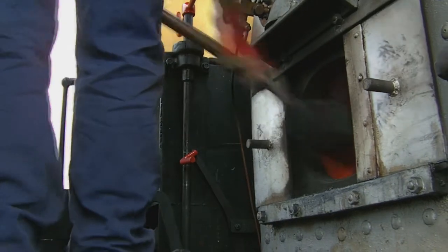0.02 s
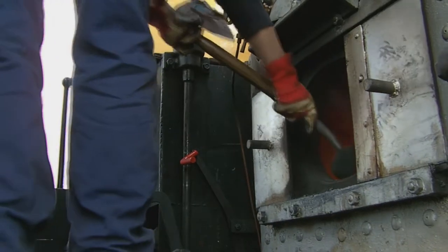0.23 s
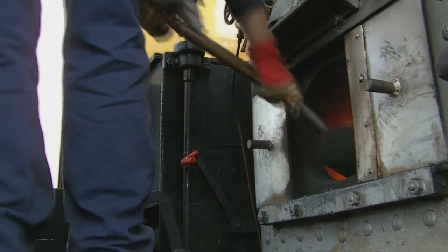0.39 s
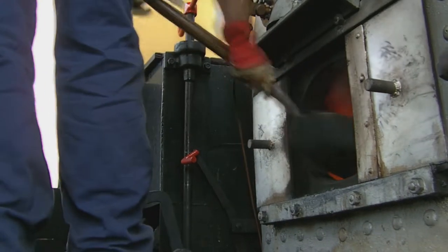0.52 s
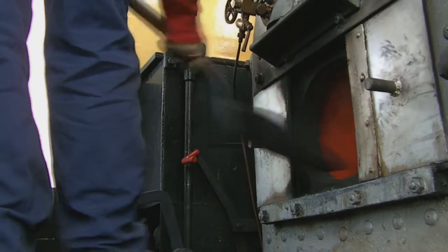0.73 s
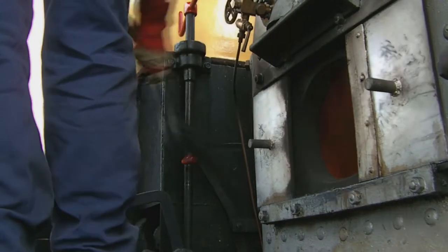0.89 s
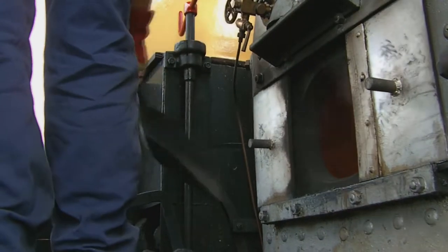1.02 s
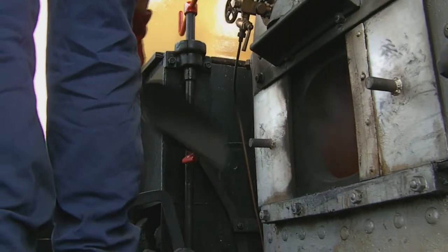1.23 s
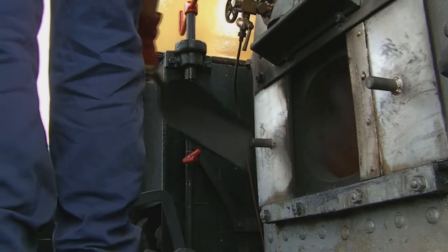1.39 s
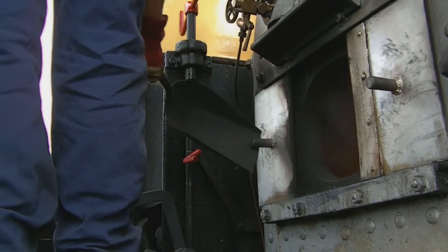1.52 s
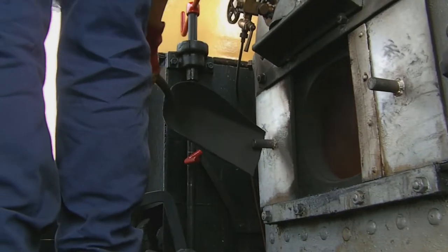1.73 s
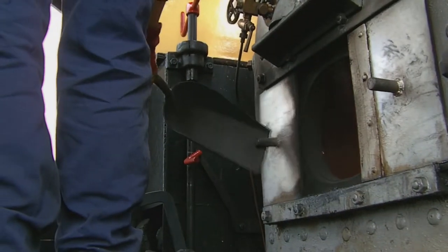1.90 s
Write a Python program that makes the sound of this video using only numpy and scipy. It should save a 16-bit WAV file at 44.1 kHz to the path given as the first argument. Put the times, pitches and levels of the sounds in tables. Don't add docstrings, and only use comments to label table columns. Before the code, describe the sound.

A steel coal shovel scrapes and clangs against iron, its blade ringing with a singing metallic tone.

```python
import sys
import numpy as np
from scipy import signal
from scipy.fft import rfft, irfft, next_fast_len
from scipy.io import wavfile
from scipy.ndimage import uniform_filter1d

SR = 44100
rng = np.random.default_rng(int(sys.argv[2]) if len(sys.argv) > 2 else 0)


def pcm_store(signal):
    levels = np.round(np.clip(np.atleast_2d(signal), -1, 1) * 32767)
    wavfile.write(sys.argv[1], SR, levels.astype(np.int16).T)


def nominal_scale(level):
    x = np.asarray(level, float) / 20
    return 10 ** x


N = 85995
SING_HZ = 705

PAN_HZ = [408, 503, 645, 972, 1205, 1270, 1346, 1484, 1621, 1800, 1964, 2057, 2121, 2396]
RIM_HZ = [2557, 2642, 2660, 2683, 2724, 3052, 3325, 3465, 4011, 4158, 4980]
PAN_T60_S = [0.56, 0.47, 0.34, 0.4, 0.33, 0.21, 0.32, 0.17, 0.34, 0.26, 0.34, 0.66, 0.41, 0.14]
RIM_T60_S = [.26, .85, .65, .6, .6, .35, .3, 1.2, .26, .22, .16]


def rms_one(x):
    return x / np.sqrt(np.mean(x ** 2) + 1e-20)


def at_hz(points, hz):
    table_hz, value = np.transpose(points)
    return np.interp(np.log(hz), np.log(table_hz), value)


def drift(rate_hz):
    pole = np.exp(-80 * np.pi * rate_hz / SR)
    white = rng.standard_normal(N // 40 + 2002)
    slow = signal.lfilter([1], [1, -2 * pole, pole * pole], white)[2000:]
    return np.interp(np.arange(N) / 40, np.arange(len(slow)), rms_one(slow))


def ring(hz, gain, t60_s, size):
    t = np.arange(size) / SR
    decay = np.exp(-np.log(1000) * np.outer(1 / t60_s, t))
    return gain @ (np.sin(2 * np.pi * np.outer(hz, t)) * decay)


def add(out, start_s, x):
    i = int(start_s * SR)
    out[i:i + len(x)] += x[:N - i]


def high_pass(x, order, cut_hz):
    return signal.sosfilt(signal.butter(order, cut_hz, "high", fs=SR, output="sos"), x)


def body(tilt_db_oct, share, count, size):
    # freq_hz, level_db
    spectrum = [(250, -14.5), (500, -7.5), (1000, -5.5), (2300, -2), (4000, -13.5), (7500, -13.5),
                (11000, -22.5), (15500, -36.5)]
    # freq_hz, t60_s
    decay_table = [(300, 0.52), (1000, 0.39), (3000, 0.35), (7000, 0.19), (14000, 0.01)]
    blur_share, rise_s = 0.71, .0007
    share, t = np.clip(share, .03, 3), np.arange(size) / SR

    def colour(hz):
        return nominal_scale(at_hz(spectrum, hz) + tilt_db_oct * np.log2(hz / 3000))

    spots, luck = rng.random(count), rng.standard_normal((2, count))
    hz = 400 + 14000 * ((np.arange(count) + spots) / count) ** 1.4
    gain = luck[0] * colour(hz)
    t60_s = at_hz(decay_table, hz) * share * np.exp(.12 * luck[1])
    apart = ring(hz, gain, t60_s, size) / np.sqrt(np.sum((hz > 1500) * gain ** 2))

    f = np.arange(size // 2 + 1) * SR / size + 1
    white = rfft(rng.standard_normal(size)) * colour(f)
    centres_hz = np.geomspace(250, 16000, 13)[:, None]
    bands = irfft(white * np.maximum(0, 1 - 2 * np.abs(np.log2(f / centres_hz))), size)
    decay = np.exp(-np.log(1000) * t / (at_hz(decay_table, centres_hz) * share))
    blur = np.sum(bands * decay, axis=0)
    blur = blur / np.std(irfft(white * (f > 1500), size)) / np.sqrt(2)

    mix = np.sqrt(1 - blur_share) * apart + np.sqrt(blur_share) * blur
    return mix * np.minimum(1, t / rise_s) / 2


def knocks():
    # start_s, peak_db, tilt_db_oct, ring_share, chatter_s
    hits = [
        (0.338, -8, -2.5, 0.73, 0.0079),
        (0.6650, -14, -2, 1, 0.0023),
        (0.7628, -7, 0.5, 0.96, 0.0043),
        (1.556, 0, 1, 0.74, 0.013),
    ]
    pan_struck_db = [
        [-53.5, -22.5, -22, -17, -35, -16.5, -23, -19, -22, -20.5, -20.5, -27.5, -28, -43.5],
        [-53.5, -23.5, -17, -52.5, -47.5, -40, -17, -18, -30.5, -31.5, -23, -29.5, -33, -50],
        [-28, -8, -21, -61, -20.5, -54, -16.5, -19.5, -25.5, -20, -34, -24, -24, -45],
        [-51, -12, -18, -28.5, -17, -72, -26, -31, -19, -40, -31, -47.5, -30, -14],
    ]
    rim_struck_db = [
        [-19, -29, -60, -24, -60, -40, -37, -41, -31, -42, -45],
        [-45, -45, -60, -30, -60, -45, -44, -41, -48, -50, -50],
        [-40, -41, -60, -29, -60, -22, -23, -45, -45, -25, -27],
        [-35, -60, -27, -60, -35, -35, -26, -60, -36, -40, -40],
    ]
    # knock_index, mode_hz, split_hz, twin_share (negative = opposed)
    twins = [(2, 2683, 7, .8), (2, 2057, -3.9, -.75), (2, 3052, 10, .6), (2, 3465, 2.7, .8),
             (3, 503, -11.5, -.5), (0, 2683, 6, .5)]
    crack_db = [-2.5, -12, -4, -12]
    pan_free = [0.88, 0.81, 0.94, 0.74]
    stop_s, crack_s, body_db = 0.0048, .0012, -4.5

    out, size = np.zeros(N), SR // 2
    hz, t60_s = np.array(PAN_HZ + RIM_HZ), np.array(PAN_T60_S + RIM_T60_S)
    is_pan = np.arange(len(hz)) < len(PAN_HZ)
    later, t = np.arange(2 * size) / SR, np.arange(1500) / SR
    for k, (start_s, peak_db, tilt_db_oct, share, chatter_s) in enumerate(hits):
        until_next_s = hits[k + 1][0] - start_s if k + 1 < len(hits) else 1
        gain = nominal_scale(np.array(pan_struck_db[k] + rim_struck_db[k])) * rng.choice([-1, 1], len(hz))
        decay_s = t60_s * np.where(is_pan, pan_free[k], 1)
        clear = ring(hz, gain, decay_s, 2 * size)
        for knock, mode_hz, split_hz, twin_share in twins:
            if knock == k:
                pick = hz == mode_hz
                clear += ring(hz[pick] + split_hz, twin_share * gain[pick], decay_s[pick], 2 * size)
        damping = np.exp(-np.maximum(0, later - until_next_s) / stop_s)
        add(out, start_s, clear * np.minimum(1, later / .004) * damping)

        bumps = (rng.random(1500) < .02) * rng.standard_normal(1500) * np.exp(-t / chatter_s)
        bumps[0] = 2
        bumps = bumps / np.sqrt(np.sum(bumps ** 2))
        dense = signal.fftconvolve(body(tilt_db_oct, share, count=90, size=size), bumps)
        add(out, start_s, nominal_scale(peak_db + body_db) * dense)
        add(out, start_s, nominal_scale(crack_db[k]) * np.sin(2 * np.pi * 1300 * t) * np.exp(-t / crack_s))
    return out


def singing():
    # time_s, level_db_rms
    swell = [(.05, -59), (0.132, -32.5), (.29, -23.5), (0.401, -22.5), (0.439, -21.5), (.53, -14),
             (.60, -8), (0.67, -8.5), (0.676, -17), (0.701, -14.5), (.784, -27), (.886, -24.5),
             (1.142, -35.5), (1.286, -52.5), (1.555, -48), (1.566, -17), (1.854, -27), (1.95, -34.5)]
    # from_s, to_s, depth_share
    rubbing = [
        (0, .41, .9),
        (.675, .80, .45),
        (1.25, 1.55, .9),
    ]
    sag_start_s, sag_hz_per_s = 1.6, 14
    rough, flutter_hz = .025, 12
    rub_depth, rub_hz = 0.74, 44

    time_s, level_db = np.transpose(swell)
    t = np.arange(N) / SR
    pitch_hz = SING_HZ - sag_hz_per_s * np.maximum(0, t - sag_start_s)
    phase = 2 * np.pi * np.cumsum(pitch_hz) / SR
    contact = sum(share * (t >= a) * (t < b) for a, b, share in rubbing)
    rub = rub_depth * uniform_filter1d(contact, size=600)
    swing = 1 + rough * drift(flutter_hz) + rub * (drift(rub_hz) + 1j * drift(rub_hz))
    tone = np.real(swing * np.exp(1j * phase)) / np.sqrt(1 + 2 * rub ** 2)
    return np.sqrt(2) * nominal_scale(np.interp(t, time_s, level_db)) * tone


def drag():
    # time_s, level_db, tilt_db_oct
    strokes = [
        [(.05, -36.5, -5), (.12, -42, -0.5), (.2, -36, -1.5), (.23, -27, 0.5), (.31, -32.5, 3.5),
         (.42, -34, -4), (.47, -48, 3.5), (.58, -51.5, 6)],
        [(.665, -38.5, -2.5), (.74, -22.5, 0), (.755, -36, 4)],
        [(1.87, -55, -0.5), (1.89, -57, 4.5), (1.95, -47.5, 4)],
    ]
    slips_per_s, slip_spread_db, rasp_db, rasp_hz = 900, 4, 2.0, 17
    ring_share, drag_db = .35, -2

    t, out = np.arange(N) / SR, np.zeros(N)
    slip_db = slip_spread_db * np.minimum(rng.exponential(1, N), 4) + rasp_db * drift(rasp_hz)
    slips = (rng.random(N) < slips_per_s / SR) * nominal_scale(slip_db) * rng.choice([-1, 1], N)

    hz = np.array(PAN_HZ + RIM_HZ[:-1] + [SING_HZ])
    clear_gain = nominal_scale(-12.0 - 3.36 * np.log2(hz / 1000))
    blade = body(0, ring_share, count=60, size=SR // 6)
    blade = blade + ring(hz, clear_gain, np.full(len(hz), .12), SR // 6)
    dull = signal.sosfilt(signal.butter(2, 3000, fs=SR, output="sos"), blade)
    scale = np.sqrt(np.mean(slips ** 2) * np.sum(dull ** 2))
    for stroke in strokes:
        time_s, level_db, tilt_db_oct = np.transpose(stroke)
        push = slips * nominal_scale(np.interp(t, time_s, level_db, left=-120, right=-120) + drag_db) / scale
        bright_push = push * nominal_scale(2 * np.interp(t, time_s, tilt_db_oct))
        out += signal.fftconvolve(push, dull)[:N]
        out += signal.fftconvolve(bright_push, blade - dull)[:N]
    return out


def touches():
    # start_s, peak_db, tilt_db_oct, ring_share
    ticks = [(0.0635, -29, 5.5, 1), (0.0886, -29.5, -10, 0.99), (0.166, -32.5, 15, 0.6),
             (0.21, -16.5, -9.5, 0.96), (0.2271, -13.5, -5.5, 1), (0.2537, -19, 6.5, 0.01),
             (0.3187, -4.5, 1.5, 0.56), (0.3894, -13.5, -9, 0.7), (0.7306, -15, -6, 0.98),
             (1.21, -36, 17, 0.35), (1.4277, -34, -4.5, 0.43), (1.6992, -35, 2.5, 0.67),
             (1.8089, -41, -15, 0.43), (1.824, -34, 6.5, 0.7), (1.884, -26.5, -4, 0.62),
             (1.5583, -21, 9, 1.8)]
    clear_db, scatter_db, longest_t60_s, touch_db = -24, 5, .1, -7.5

    out = np.zeros(N)
    hz, t60_s = np.array(PAN_HZ + RIM_HZ), np.array(PAN_T60_S + RIM_T60_S)
    for start_s, peak_db, tilt_db_oct, share in ticks:
        slope_db = (np.minimum(tilt_db_oct, 0) + 6.5) * np.log2(hz / 3000)
        gain = nominal_scale(clear_db + scatter_db * rng.standard_normal(len(hz)) + slope_db)
        decay_s = np.minimum(t60_s, longest_t60_s) * np.clip(share, .03, 1)
        clear = ring(hz, gain, decay_s, size=5000)
        dense = body(tilt_db_oct, share, count=30, size=5000)
        add(out, start_s, nominal_scale(peak_db + touch_db) * (dense + clear))
    return out


def catches():
    # start_s, peak_db, centre_hz, t60_s
    snags = [(.1662, -27.5, 720, .05), (.178, -28, 720, .06), (.2085, -31, 800, .06),
             (.2267, -26.5, 2200, .07), (.2275, -18, 1500, .06), (.2525, -30, 5600, .12),
             (.2525, -25.5, 760, .06), (.272, -29.5, 3800, .1), (.286, -25.5, 750, .08),
             (.391, -35, 4100, .15), (.6653, -23, 1450, .04), (.676, -18.5, 1400, .04),
             (.6982, -17, 1400, .04), (.727, -20.5, 2800, .08), (.7626, -17.5, 3100, .04),
             (.776, -28.5, 830, .12), (1.2091, -36, 2500, .05), (1.2091, -39.5, 3200, .05),
             (1.27, -42.5, 2300, .06), (0.669, -31.5, 545, .08), (.255, -21, 974, 0.12),
             (.228, -30, 524, .1), (.345, -20.5, 1057, 0.15), (1.559, -29.5, 1206, 0.13),
             (1.887, -47, 6000, .05)]
    spread = .1

    out = np.zeros(N)
    for start_s, peak_db, centre_hz, t60_s in snags:
        place, strength = rng.random((2, 5))
        hz = centre_hz * (1 + spread * (np.arange(5) - 2.5 + place) / 2)
        patch = ring(hz, (.5 + strength) / 3, np.full(5, t60_s), size=7000)
        add(out, start_s, nominal_scale(peak_db) * patch)
    return out


def thuds():
    # start_s, peak_db, pitch_hz
    bumps = [(1.331, -29.5, 293), (1.36, -27.5, 270), (1.404, -43.5, 166), (1.765, -29.5, 335),
             (1.783, -26, 250.5), (1.816, -29, 307.6), (1.844, -37, 129), (1.866, -50, 113),
             (1.911, -38.5, 202), (1.934, -29, 262), (0.029, -37, 203), (0.159, -43, 145)]
    t60_cycles = 16.7

    out, t = np.zeros((2, N)), np.arange(6000) / SR
    for start_s, peak_db, pitch_hz in bumps:
        hz = pitch_hz * np.array([.7, 1, 1.45])
        plate = ring(hz, np.array([.5, 1, -.4]), t60_cycles / hz, len(t))
        x = nominal_scale(peak_db) * plate * np.minimum(1, t * pitch_hz)
        for side in out:
            side_delay_s = rng.uniform(0, .003) if side is not out[0] and np.shares_memory(side, out[1]) else 0
            add(side, start_s + side_delay_s, x * nominal_scale(rng.normal(0, 2)))
    return out


def murmur():
    # freq_hz, density_db_per_hz
    spectrum = [(25, -14), (55, -11.5), (100, -9.5), (300, -2.5), (800, 2.5), (1800, -12), (4500, -23.5),
                (12500, -30.5)]
    # freq_hz, likeness_0_to_1
    likeness = [(40, 0.2), (150, 0.84), (500, 0.93), (3000, 0.93), (12000, 0.3)]
    level_db, top_hz = -45.5, 14300

    out, together = 0, drift(3.0)
    edges_hz = 22 * 2 ** np.arange(0, 9.6, .5)
    white = rng.standard_normal((2, 2, N + SR // 2))
    for k, (low_hz, high_hz) in enumerate(zip(edges_hz, edges_hz[1:])):
        band = signal.butter(2, [low_hz, high_hz], "band", fs=SR, output="sos")
        mid, side = signal.sosfilt(band, white[k % 2])[:, SR // 2:]
        hz = np.sqrt(low_hz * high_hz)
        alike = np.clip(at_hz(likeness, hz), 0, 1)
        gain = nominal_scale(at_hz(spectrum, hz) + 1.2 * together + 2.2 * drift(9))
        out = out + gain * (np.sqrt(1 + alike) * mid + np.sqrt(1 - alike) * side * [[1], [-1]])
    fire = nominal_scale(level_db) * rms_one(out)
    return signal.sosfilt(signal.cheby2(10, 50, top_hz, fs=SR, output="sos"), fire)


def cab(x):
    t60_s, wall_cut_hz = 0.11, 11000
    size = next_fast_len(N + SR)
    w = 2 * np.pi * np.arange(size // 2 + 1) / size
    dull = 1 / (1 + 1j * w * SR / (2 * np.pi * wall_cut_hz))
    out = np.zeros((2, len(w)), complex)
    for k, lag_s in enumerate(rng.uniform(0.0065, 0.021, 16)):
        loop = nominal_scale(-60 * lag_s / t60_s) * dull * np.exp(-1j * w * lag_s * SR)
        out[k % 2] += (-1) ** (k // 2) * loop / (1 - loop)
    echoes = irfft(out * rfft(x, size), size)[:, :N]
    return signal.lfilter([1, -1], [1], echoes)


def scene():
    left_db, shadow_hz, cab_db = -1.25, 5000, -10
    light = high_pass(touches() + drag(), 6, 480)
    clatter = light + high_pass(knocks() + catches(), 4, 261)
    shovel = clatter + singing()
    low = signal.lfilter(*signal.butter(1, shadow_hz, fs=SR), shovel)
    placed = shovel - low + low * nominal_scale(np.array([[left_db], [-left_db]]))
    return placed + nominal_scale(cab_db) * cab(clatter) + thuds() + murmur()


def band_limit(x):
    return signal.sosfilt(signal.butter(12, 16640, fs=SR, output="sos"), x)


def record(dry):
    rounded = dry / (1 + (dry / .93) ** 8) ** (1 / 8)
    mix = signal.sosfilt(signal.cheby2(10, 60, 16500, fs=SR, output="sos"), rounded)
    return band_limit(mix)


dry = scene()
out = record(dry)
pcm_store(out)
```